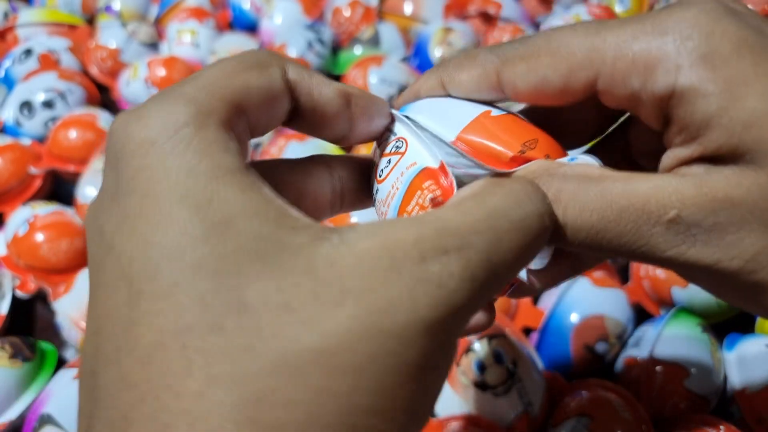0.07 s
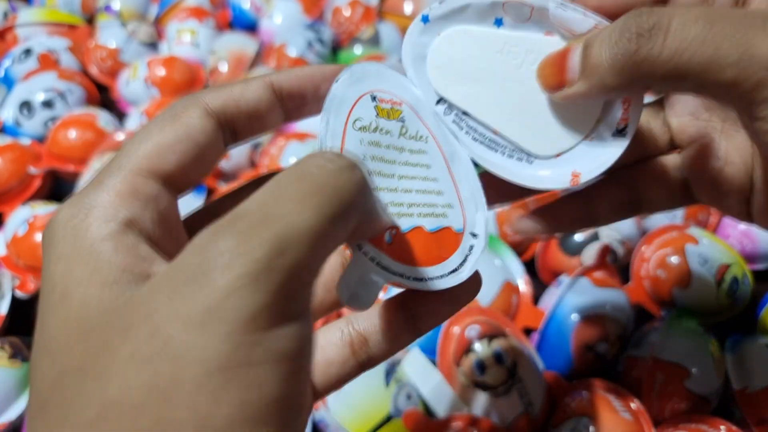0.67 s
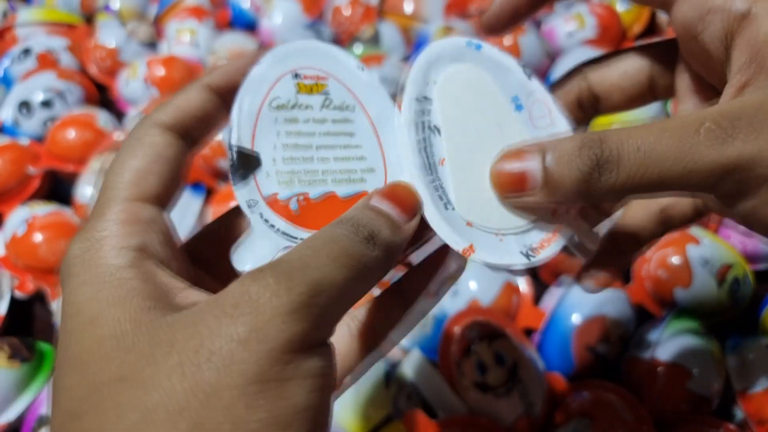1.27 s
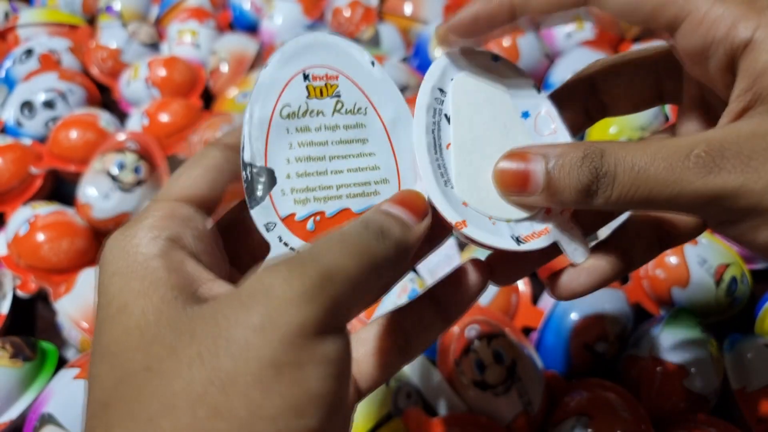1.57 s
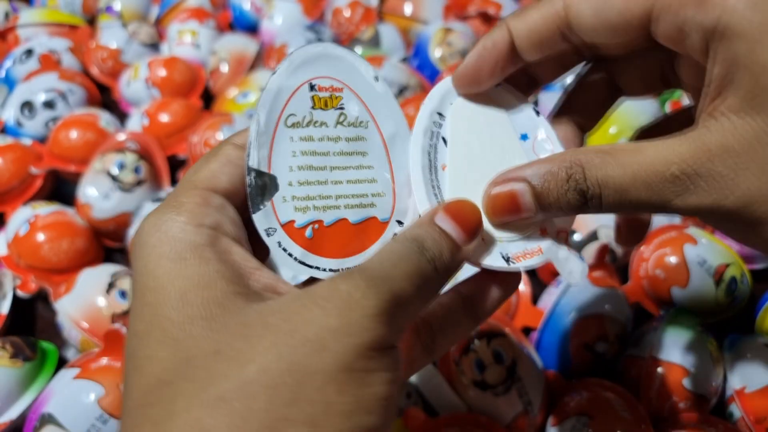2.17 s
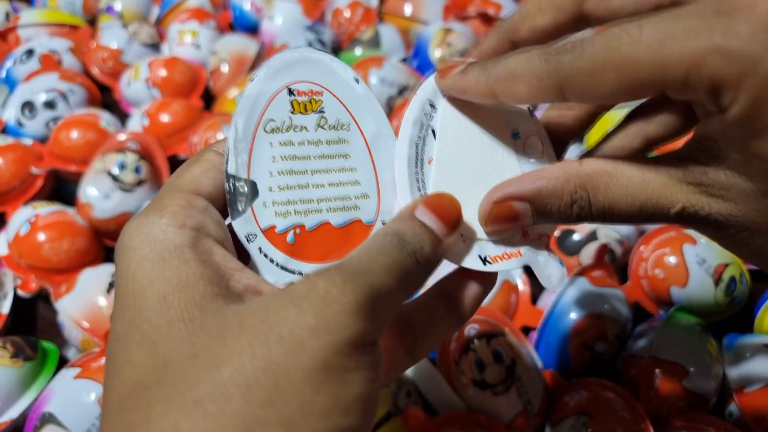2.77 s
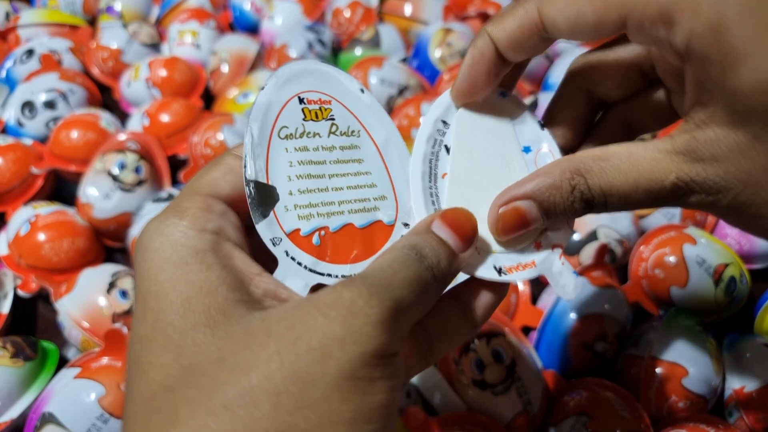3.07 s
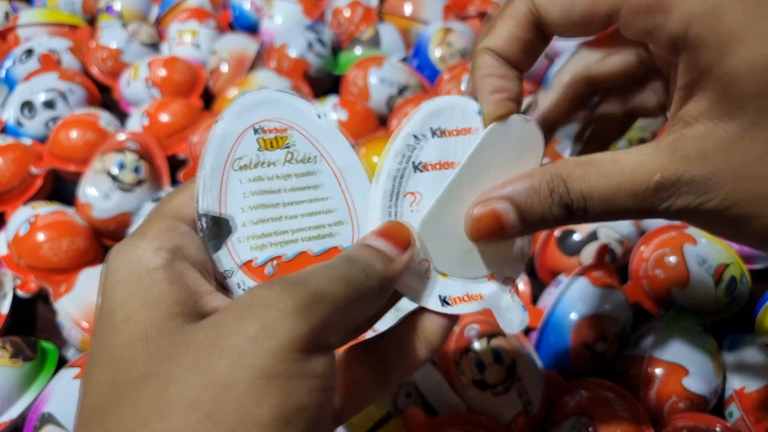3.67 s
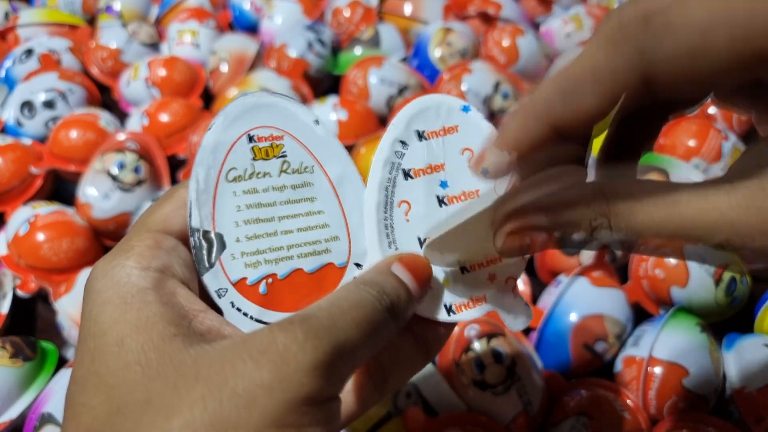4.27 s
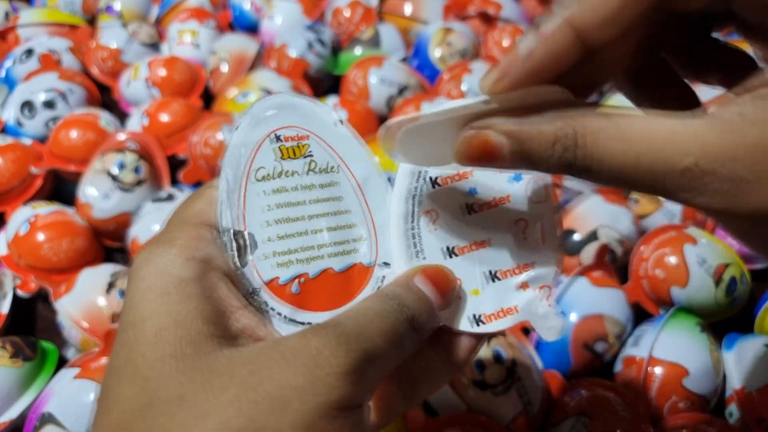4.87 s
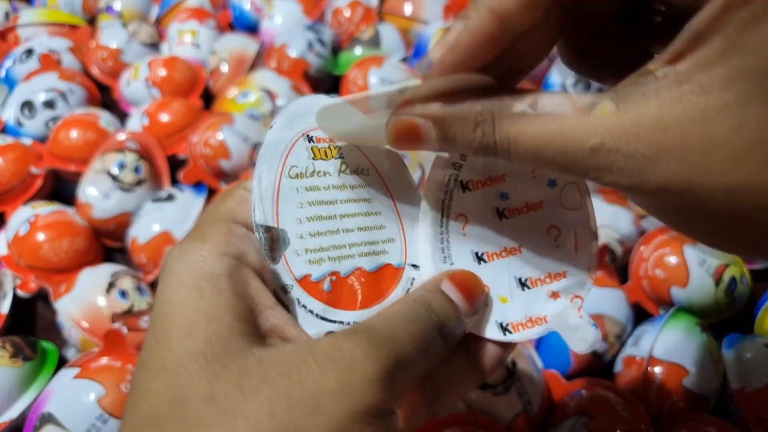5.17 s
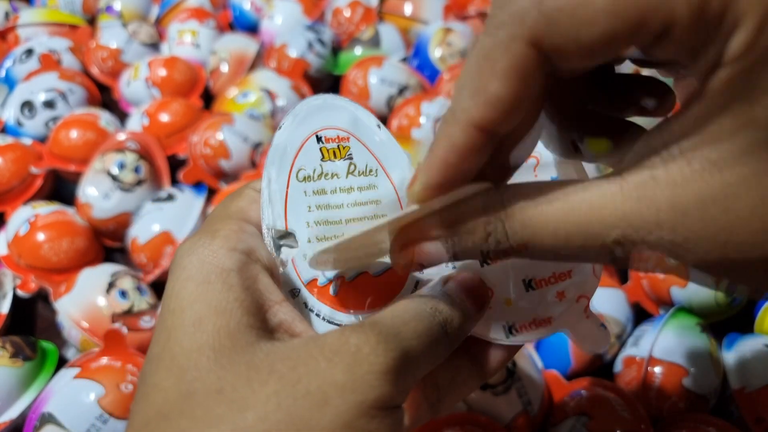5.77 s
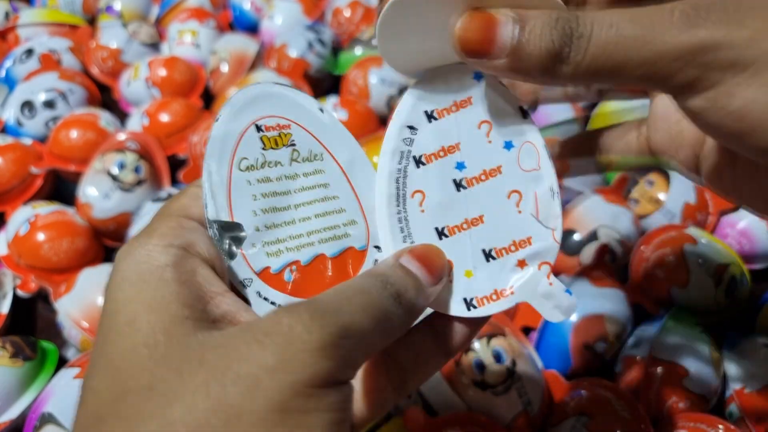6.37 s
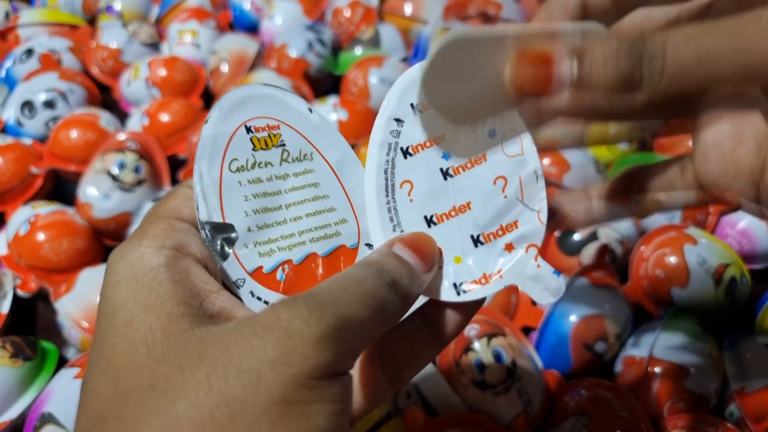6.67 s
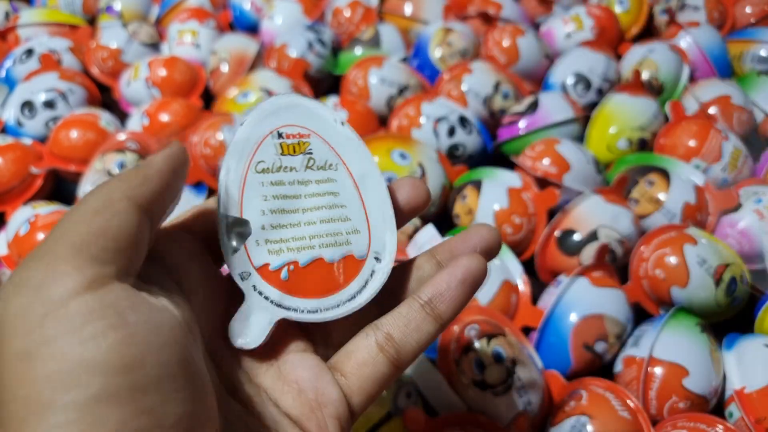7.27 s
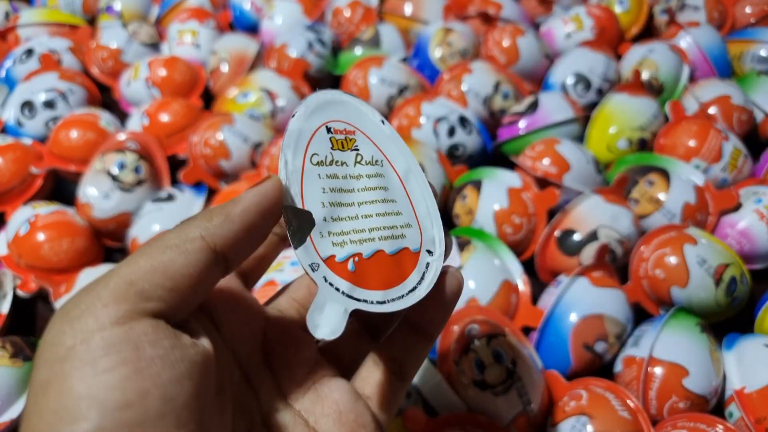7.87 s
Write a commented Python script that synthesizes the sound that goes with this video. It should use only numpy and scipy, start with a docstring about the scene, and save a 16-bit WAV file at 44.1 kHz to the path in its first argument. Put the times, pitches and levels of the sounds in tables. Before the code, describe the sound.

A thin plastic egg snaps open and crackles close up, then a little spoon taps its halves in an echoing room.

```python
"""A thin plastic egg in the hands, close to a phone's two microphones in a hard, echoing room.
The shell snaps as it bends, and at 0.3 s its halves fly apart with a puff of air. Crackles and rubs follow
as a small plastic spoon is prised off the foil seal, with a run of snaps from 3.2 s. From 4.4 s the hand
wipes over the seal, then the spoon taps the sealed halves like small drums. A faint whine and a few last
snaps come after 7 s. A distant motor hums under it all."""
import sys
import numpy as np
from scipy import signal
from scipy.fft import rfft, irfft
from scipy.io import wavfile
from scipy.ndimage import uniform_filter1d

SR = 44100
rng = np.random.default_rng(int(sys.argv[2]) if len(sys.argv) > 2 else 0)


def to_wav(sig):
    """Store sig (one row per channel, or 1-D mono) as 16-bit WAV at the path in sys.argv[1].

    Samples outside -1..1 are clipped; the rate is SR.
    """
    pcm = np.clip(np.atleast_2d(sig), -1, 1) * 32767
    pcm = np.round(pcm).astype(np.int16)
    wavfile.write(sys.argv[1], SR, pcm.T)  # frames by channels


N = 349272
TIME = np.arange(N) / SR
RIGHT_LAG_S = 0.00012  # the egg is slightly nearer the left microphone

# The shell and its seal snapping, close up. Each row: start in seconds, then level, hollow, edge,
# sharpness and room send, all in dB. Hollow, edge and sharpness set 1, 4 and 8.5 kHz against 2 kHz.
SHELL_SNAPS = [(0.0278, 2.5, -4.5, 2, -3.5, -7), (0.0625, -0.5, 3, -6.0, -19, -5.5),
               (0.1787, -14.0, 1, 14, 13, -12), (0.2537, -9.5, -7, 10, 0.0, 2),
               (0.2692, 17, -9.5, -1, -5.0, -4.5), (0.2821, 8.5, -2, 6, -0.5, -7),
               (0.3023, 11, -1, 6.5, -10.5, -4.5), (0.3133, 9.5, -4.5, -4, -13, -3.5),
               (0.4092, 1, 6.5, -3, -17.0, -6.5), (0.501, -4, -2, 2, -7.5, -9),
               (0.5252, -5.5, 3.5, -4, -5.0, -22), (0.5896, 13.5, -12.5, -14, -12.5, -11),
               (0.9474, 11.5, -10.5, -4.5, -13, 2), (1.1964, 8, -1.5, -4.5, -22.5, -7.5),
               (1.4495, -14.5, -11.5, 0.5, -7.5, -12), (1.7771, -12.5, -1.5, -6, -24, 0),
               (2.0171, 5.5, -4, -12.5, -33, -6.5), (2.3852, -8.5, 0.0, 0, -18.5, -13),
               (2.5167, -14.0, 2.5, -9, -20, -5.5), (3.0107, -12.5, -6.0, 8.5, -17.5, -7.5),
               (3.2203, -21.0, 3.5, 9, 1, -8), (3.2605, -18.5, -1.5, 6, -0.5, -3.5),
               (3.2781, 5.5, -15.5, 9, 1, -13.5), (3.2906, 5.5, -17, 4.0, -15, -5),
               (3.301, 10, -16, 1.5, -10.5, -13.5), (3.3192, 15, -8.5, -11.5, -8.5, -7.5),
               (3.3437, 6, -11.5, 2.5, -11.5, -12), (3.357, 14.5, -14.5, -10, -12, -11),
               (3.6067, 14.5, -12.0, -6, -9.5, -1.5), (3.6253, 18, -7, -1.0, -7.0, -9),
               (3.6282, 15.5, -3.5, -4.5, -13.5, -11), (3.6345, 13, -7, -4.5, -12.5, -11),
               (3.6434, 16, 8, -2.0, -7.5, -9.5), (3.652, 19, 3, -9.5, -14.5, -15.5),
               (3.7873, 2.0, -8, -4, -16, 0.5), (3.8722, -0.5, -14, -3.0, -15.0, -8),
               (4.128, -7, -14, -22, -12, -11), (4.1589, 8, -4.0, -12, -16, -17),
               (7.0508, -3.5, 2.5, 3, -9.5, -8), (7.8122, -7.5, 6, -7.5, -15.5, -2),
               (7.8529, -6.5, -11, -7.5, -21, -4.5)]
# Resonances of the cupped shell. Each row: centre in Hz, width in Hz, lift in dB.
SHELL_RESONANCES = [(458, 230, 2.5), (1210, 240, 2), (1700, 120, 2), (2400, 260, 2), (3340, 300, 3),
                    (4570, 850, 2), (6180, 900, -4), (8680, 1500, -1.5)]


def snaps():
    """The bent shell gives way in snaps, with fine crackle around them."""
    return clicks(SHELL_SNAPS, SHELL_RESONANCES) + clicks(crackles(), SHELL_RESONANCES)


# Spells of strain in the plastic. Each row: start and end in seconds, buckles per second,
# level in dB, sharpness in dB.
STRAIN_SPELLS = [(0.189, 0.259, 40, -16.5, -5), (0.274, 0.315, 136, 2.5, -7), (0.444, 0.648, 15, -6, -16),
                 (1.172, 1.19, 50, -10, -4), (1.3, 3.201, 2, -23, -13), (3.613, 3.659, 70, 10.5, -13),
                 (3.75, 3.991, 14, -10.5, -5)]


def crackles(spread_db=2.5, hollow_db=-4, room_db=-9):
    """Click rows for the small buckles, scattered unevenly while the plastic is under strain."""
    rows = []
    for start, end, per_s, level_db, sharpness in STRAIN_SPELLS:
        count = max(1, round((end - start) * per_s))
        times = start + (end - start) * (np.arange(count) + rng.random(count)) / count
        for s, (louder, hollower, sharper) in zip(times, spread_db * rng.standard_normal((count, 3))):
            edge = edge_db(sharpness + sharper, offset_db=2.5)
            rows.append((s, level_db + louder, hollow_db + hollower, edge, sharpness + sharper, room_db))
    return rows


# The spoon on the sealed halves, close up. Each row: start in seconds, then level, hollow, sharpness in dB.
SPOON_TAPS = [(4.9246, 15, -3, -22.5), (5.0887, 1, -14, -25.5), (5.2011, 13, -5.5, -23),
              (5.2602, 7, -17, -16.5), (5.3166, 9, -3.5, -37), (5.4122, 0.5, -4.5, -37),
              (5.4439, 3.5, -5, -30), (5.452, 13.5, -8.5, -21.5), (5.5643, 6.5, -8, -31),
              (5.572, 10.5, -12.5, -24.5), (5.5787, 15, -11.5, -25.5), (5.6658, 15, -11.5, -30.5),
              (5.687, 6, -2, -20), (5.6915, 14, -11.5, -23), (5.7924, 10, -14, -21.5),
              (5.8017, 11.5, -13, -32), (5.8143, 14, -8, -36), (5.9025, 10.5, -20, -37),
              (5.9113, 2, -6, -19), (5.9187, 9, -11, -38), (5.9456, 7, -2.5, -43), (5.9954, 7.5, -11, -36),
              (6.0506, 14.5, -9, -22.5), (6.142, 7, -8, -17.5), (6.2461, 12.5, -10, -34),
              (6.2581, 16, -8, -24)]
# Resonances of a sealed half. Each row: centre in Hz, width in Hz, lift in dB.
SEALED_HALF_RESONANCES = [(470, 170, 8), (970, 95, 4), (1735, 360, 3), (2400, 170, 1), (3480, 400, 5),
                          (4530, 490, 3), (5860, 2400, -0.5), (9100, 1700, -4.5)]


def taps(room_db=-9):
    """The spoon strikes a sealed half like a small drum."""
    rows = [(s, level_db, hollow, edge_db(sharpness, offset_db=5.5), sharpness, room_db)
            for s, level_db, hollow, sharpness in SPOON_TAPS]
    return clicks(rows, SEALED_HALF_RESONANCES)


def clicks(rows, modes, pan_spread_db=1.96):
    """One buckling a row, direct and sent to the room, which gathers it from all sides with less ripple."""
    direct, sent = np.zeros((2, 2, N))
    for s, level_db, *colour, room_db in rows:
        pan_db = pan_spread_db * rng.standard_normal() * np.array([[.5], [-.5]])  # the hands move about
        add(direct, s, from_db(level_db + pan_db) * buckling(*colour, modes, flutter=0.15))
        add(sent, s, from_db(level_db + room_db) * buckling(*colour, modes, flutter=0.03))
    return np.array([direct, sent])


def buckling(hollow, edge, sharpness, modes, flutter, ring_s=0.0016, trim_db=-0.5, size=2048):
    """A kick, then bending waves that cross the shell for a few ms and reach each microphone differently."""
    t = np.arange(size) / SR
    waves = stereo_noise(size, unshared=0.95) * np.exp(-t / ring_s)
    kick = (t == 0) * rng.choice([-1, 1])
    burst = rfft(kick + flutter * waves)
    # divided out below, so the waves ripple the spectrum but do not tilt it
    broad_db = 10 * np.log10(uniform_filter1d(np.abs(burst) ** 2, size=55) + 1e-9)
    lag_s = abs(RIGHT_LAG_S + 0.00004 * rng.standard_normal())
    colour_db = body_db(bins(size), hollow, edge, sharpness, flexed(modes))
    return irfft(burst * right_delay(lag_s, size) * causal(colour_db + trim_db - broad_db))


def body_db(hz, hollow, edge, sharpness, modes):
    """Spectrum in dB of a small thin body: little bass, broad resonances, treble set by the contact."""
    hz_and_db = [(40, -31), (250, -14 + hollow / 2), (650, -13.5 + hollow / 2), (1050, hollow),
                 (2000, 0), (4000, edge), (8500, sharpness), (15000, 1.29 * sharpness - 9)]
    peaks = sum(lift / (1 + (2 * (hz - centre) / width) ** 2) for centre, width, lift in modes)
    return at_hz(hz_and_db, hz) + peaks


def flexed(modes, spread_db=2.1, detune=0.026):
    """The grip and the place of each contact shift the resonances and favour some of them."""
    return [(hz * np.exp(detune * rng.standard_normal()), width, lift + spread_db * rng.standard_normal())
            for hz, width, lift in modes]


def edge_db(sharpness, offset_db):
    """In lighter contacts the edge at 4 kHz follows the sharpness."""
    return 0.56 * sharpness + offset_db


# A faint room echo dying away at the start, then fingers and plastic sliding and foil tearing, close up.
# Each row: start and end in seconds, then level, hollow and sharpness in dB.
ECHO_AND_STROKES = [(0.003, 0.115, -41.5, 7, -6), (0.273, 0.319, -22.5, 2, -15),
                    (1.681, 1.72, -46.5, 0, -16), (2.055, 2.099, -46, -3, -16),
                    (2.618, 2.656, -41.5, -5, -9.5), (2.814, 2.866, -48.5, -14.5, -13.5),
                    (3.966, 3.99, -38, 1, -13), (4.121, 4.136, -27.5, -4, -15.5),
                    (4.161, 4.23, -30, 7.5, -13), (6.441, 6.53, -44.5, -3, -17),
                    (6.612, 6.66, -36.5, -19, -11.5), (7.813, 7.893, -51.5, 0.5, -31)]


def rubbing():
    """The faint opening echo, then single strokes, the hand's wipes and soft brushes of finger or sleeve."""
    return strokes(ECHO_AND_STROKES, edge_offset_db=4.5) + strokes(wipes() + brushes(), edge_offset_db=0.5)


def wipes(start_s=4.408, period_s=0.096, length_s=0.054, first_db=-51, growth_db=4, dulling_db=0.83):
    """Stroke rows for the hand wiping to and fro, pressing harder: each wipe is louder and duller."""
    hollow, sharpness = -2, -2  # dB
    return [(s, s + length_s, first_db + growth_db * k, hollow, sharpness - dulling_db * k)
            for k, s in enumerate(start_s + period_s * np.arange(6))]


def brushes(before_s=0.015, after_s=0.03, offset_db=-58.5, hollow_db=-2, sharpness_db=-6):
    """Stroke rows for fingers or a sleeve brushing softly around each tap."""
    return [(s - before_s, s + after_s, tap_db + offset_db, hollow_db, sharpness_db)
            for s, tap_db, *_ in SPOON_TAPS]


# Resonances of the rubbed foil and spoon. Each row: centre in Hz, width in Hz, lift in dB.
FOIL_RESONANCES = [(1085, 230, 3), (2350, 440, 5), (3030, 450, 13), (7010, 1070, -3.4), (9200, 1230, 0.5)]


def strokes(rows, edge_offset_db, grain_db=2.5, catch_db=3.5, trim_db=-2, room_db=-10, size=8192):
    """A grainy hiss a row, as when tiny uneven slips set the foil ringing; direct and room send."""
    direct = np.zeros((2, N))
    lag = right_delay(RIGHT_LAG_S, size)
    for start, end, level_db, hollow, sharpness in rows:
        count = int(np.clip((end - start) * SR, 2, size))
        slips = stereo_noise(size, unshared=0.96)
        grip = from_db(grain_db * rms_one(uniform_filter1d(rng.standard_normal(size), size=30)))
        # a sliding finger sticks and lets go every few ms
        catches = from_db(catch_db * rms_one(uniform_filter1d(rng.standard_normal(size), size=220)))
        force = rms_one((slips * grip * catches)[:, :count] * signal.windows.tukey(count, 0.28))
        modes = flexed(FOIL_RESONANCES, spread_db=1.0, detune=0.04)
        colour_db = body_db(bins(size), hollow, edge_db(sharpness, edge_offset_db), sharpness, modes)
        body = causal(colour_db + level_db + trim_db)
        add(direct, start, irfft(rfft(force, size) * body * lag))
    return np.array([direct, direct * from_db(room_db)])


def puff(s=0.282, hz=60, length_s=0.0067, level_db=-28):
    """The halves fly apart and push a puff of air at the microphones."""
    age = np.maximum(TIME - s, 0)
    return from_db(level_db) * age / length_s * np.exp(1 - age / length_s) * np.sin(2 * np.pi * hz * age)


# The echo of the hard room. Each row: frequency in Hz, gain in dB.
ECHO_COLOUR = [(155, -3.5), (455, 5), (1020, -1.1), (2050, -0.6), (4050, -2.5), (9050, 4.5), (14600, 2.5)]
# How long the room rings. Each row: frequency in Hz, seconds to fall by 60 dB.
ECHO_DECAY = [(155, 1.1), (805, 1.02), (2050, 0.79), (5050, 0.66), (9050, 0.55), (14600, 0.41)]


def reverb(sent, first_echo_s=0.0068, early_s=0.013, size=65536):
    """A first reflection from nearby, then a diffuse tail that dies sooner in the treble."""
    t, hz = np.arange(size) / SR, bins(size)
    noise, tail = rfft(rng.standard_normal((2, size))), 0
    edges_hz = np.geomspace(80, 18000, 19)
    for low, high in zip(edges_hz, edges_hz[1:]):
        centre = np.sqrt(low * high)
        band = irfft(noise * ((hz >= low) & (hz < high)))
        decay = np.exp(-np.log(1000) * t / at_hz(ECHO_DECAY, centre))
        tail = tail + band * from_db(at_hz(ECHO_COLOUR, centre)) * decay
    early_lift = 1 + (t >= first_echo_s) * np.exp(-np.abs(t - first_echo_s) / early_s)
    response = tail * early_lift * np.sqrt(2 * np.log(1000) / SR)
    return signal.fftconvolve(sent, response, axes=1)[:, :N]


# The distant motor's low and upper drones. Each row: time in seconds, level in dB (upper: before its trim).
MOTOR_LOW = [(0, -57.5), (2.7, -57.5), (4.3, -54.5), (5.1, -49.5), (6.8, -53), (7.9, -47)]
MOTOR_UPPER = [(0, -62), (2.7, -61), (3.0, -50), (3.4, -58), (4.4, -60), (5.2, -52), (6.8, -57), (7.4, -44),
               (7.9, -41)]


def motor(upper_trim_db=-1):
    """A motor far from the microphones hums on two tones that grow louder toward the end."""
    low = drone(hz=105.5, level_db=in_time(MOTOR_LOW), wander_hz=2.81, waver_db=4.0)
    upper = drone(hz=174.5, level_db=in_time(MOTOR_UPPER) + upper_trim_db, wander_hz=2.4, waver_db=1.6)
    return low + upper


def whine(start_s=7.14, end_s=7.66, ramp_s=0.06, first_db=-61.5, fade_db_per_s=16):
    """A faint high tone sets in, fades and stops."""
    gate = np.clip(1 + np.minimum(TIME - start_s, end_s - TIME) / ramp_s, 0, 1)
    level_db = first_db - fade_db_per_s * np.maximum(TIME - start_s, 0)
    return gate * drone(hz=2944, level_db=level_db, wander_hz=8.7, waver_db=4.0)


def drone(hz, level_db, wander_hz, waver_db):
    """A tone that wavers in pitch and strength."""
    phase = 2 * np.pi * np.cumsum(hz + wander_hz * drift(rate_hz=5)) / SR
    return np.sqrt(2) * from_db(level_db + waver_db * drift(rate_hz=12)) * np.sin(phase)


# The room's own noise. Each row: frequency in Hz, relative level in dB.
ROOM_SPECTRUM = [(20, -18), (42, -1), (107, -12.5), (130, -9.5), (175, -7.5), (397, -12.5), (481, -16.5),
                 (705, -17), (853, -21.5), (1320, -25), (1600, -28.5), (1740, -27.5), (13800, -51.5),
                 (15000, -59)]
# How alike it is at the two microphones. Each row: frequency in Hz, correlation from 0 to 1.
ROOM_LIKENESS = [(41, 0.74), (133, 0.9), (305, 0.94), (655, 0.2), (1320, 0.055), (14800, .03)]
# Its slow rise and fall. Each row: time in seconds, level in dB.
ROOM_LEVEL = [(0, -47.5), (.8, -51.5), (2.2, -49.5), (3.2, -48), (4.4, -50), (5.3, -47), (6.2, -47.5),
              (6.8, -49), (7.9, -47.5)]


def room_tone():
    """Rumble that both microphones share, under a faint, wide hiss."""
    hz = bins(N)
    mid, side = rfft(rng.standard_normal((2, N)))
    alike = at_hz(ROOM_LIKENESS, hz)
    noise = np.sqrt(1 + alike) * mid + np.sqrt(1 - alike) * side * [[1], [-1]]
    air = rms_one(irfft(from_db(at_hz(ROOM_SPECTRUM, hz)) * noise, N))
    return air * from_db(in_time(ROOM_LEVEL))


def from_db(db):
    """Decibels to gain."""
    return 10 ** (np.asarray(db) / 20)


def rms_one(x):
    """Scale to rms 1."""
    return x / np.sqrt(np.mean(x ** 2) + 1e-20)


def in_time(points):
    """Read (seconds, value) points at every sample."""
    return np.interp(TIME, *np.transpose(points))


def at_hz(points, hz):
    """Read (Hz, value) points on a log-frequency axis."""
    knots, values = np.transpose(points)
    return np.interp(np.log(np.maximum(hz, 1)), np.log(knots), values)


def bins(size):
    """Frequencies of a spectrum of this many samples."""
    return np.fft.rfftfreq(size, 1 / SR)


def drift(rate_hz):
    """A slow random curve with rms 1."""
    return rms_one(irfft(rfft(rng.standard_normal(N)) / (1 + (bins(N) / rate_hz) ** 2), N))


def stereo_noise(size, unshared):
    """Noise common to both microphones, plus a part of their own."""
    return rng.standard_normal(size) + unshared * rng.standard_normal((2, size))


def right_delay(lag_s, size):
    """Phase shift that makes a sound reach the right microphone later."""
    return np.exp(-2j * np.pi * bins(size) * np.array([[0], [lag_s]]))


def causal(gain_db):
    """Minimum-phase response for a gain curve: it rings only after the blow."""
    cepstrum = irfft(np.log(from_db(gain_db)))
    size = cepstrum.shape[-1]
    cepstrum[..., 1:size // 2] *= 2
    cepstrum[..., size // 2 + 1:] = 0
    return np.exp(rfft(cepstrum))


def add(out, s, sound):
    """Mix a stereo sound in at time s."""
    start = max(0, round(s * SR))
    part = out[:, start:start + sound.shape[1]]
    part += sound[:, :part.shape[1]]


# The colour of the phone's two microphones. Each row: frequency in Hz, left minus right in dB.
MICROPHONE_BALANCE = [(60, -1), (130, 0), (290, -2.5), (640, -1.0), (1410, 2.5), (3100, -3), (6820, 1),
                      (15000, 3)]


def scene():
    """The egg close to the phone, its echo around it and the background behind."""
    background = room_tone() + motor() + whine()
    direct, sent = taps() + rubbing() + snaps()
    balance = from_db(at_hz(MICROPHONE_BALANCE, bins(N)) * [[.5], [-.5]])
    egg = irfft(rfft(direct + reverb(sent)) * balance, N)
    return egg + puff() + background


def record(dry):
    """The phone drops the deepest rumble, clips peaks at full scale and cuts the top."""
    low_cut = signal.butter(3, 27, "high", fs=SR, output="sos")
    high_cut = signal.ellip(10, .2, 80, 16300, fs=SR, output="sos")
    clipped = np.clip(signal.sosfilt(low_cut, dry), -1, 1)
    return signal.sosfilt(high_cut, clipped)


dry = scene()
out = record(dry)
to_wav(out)
```